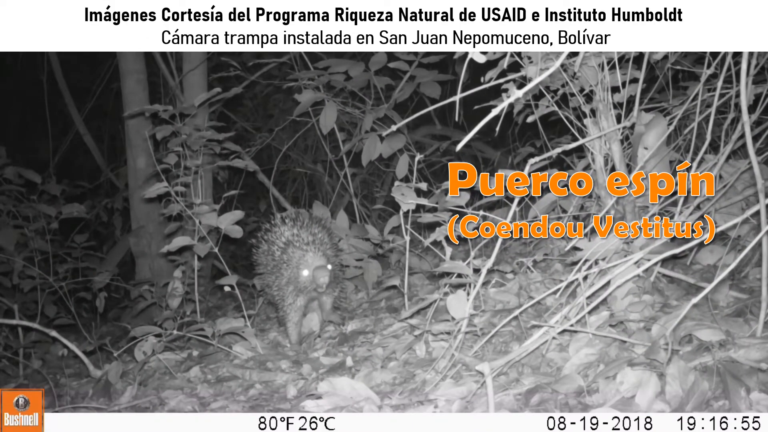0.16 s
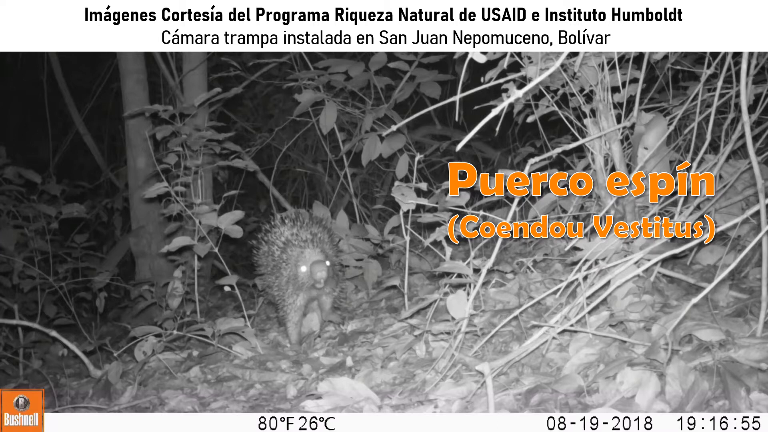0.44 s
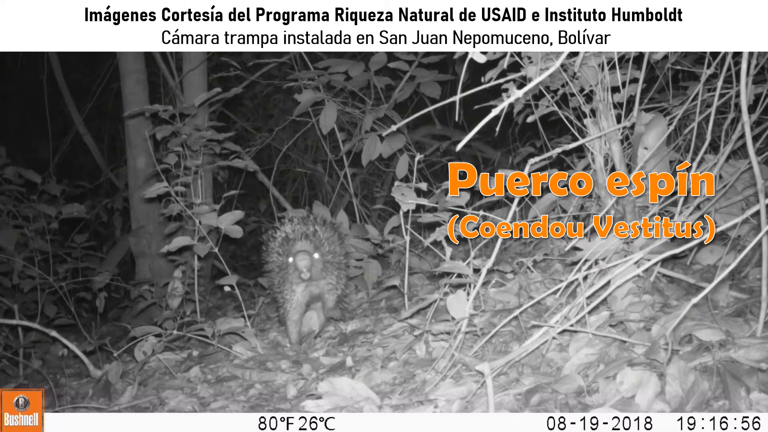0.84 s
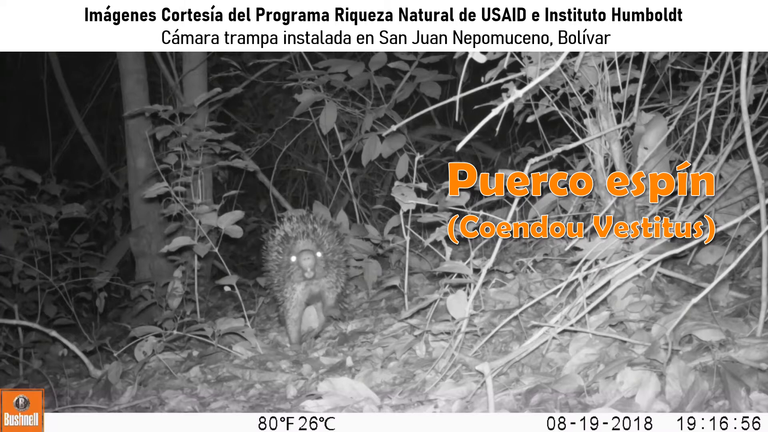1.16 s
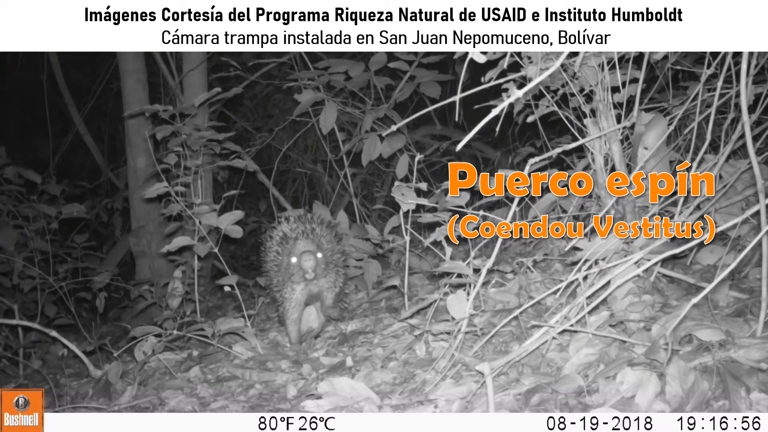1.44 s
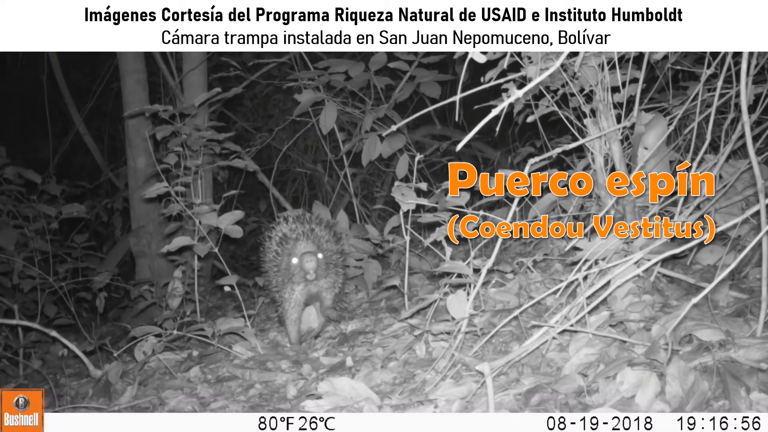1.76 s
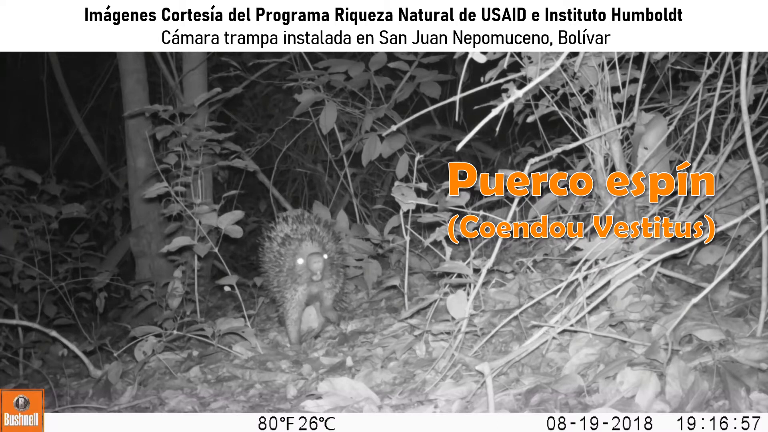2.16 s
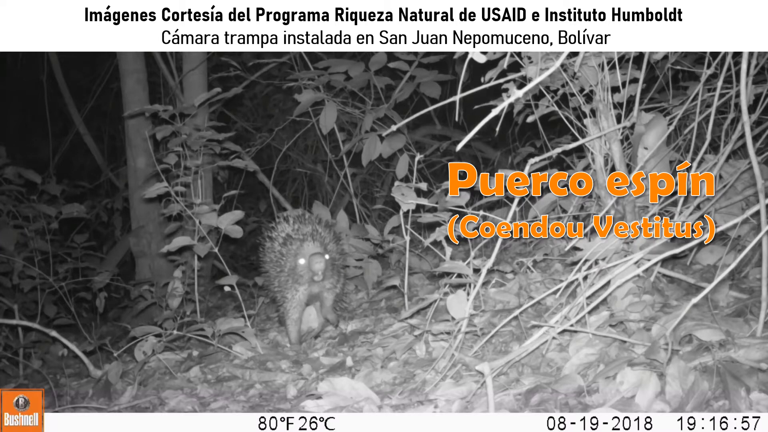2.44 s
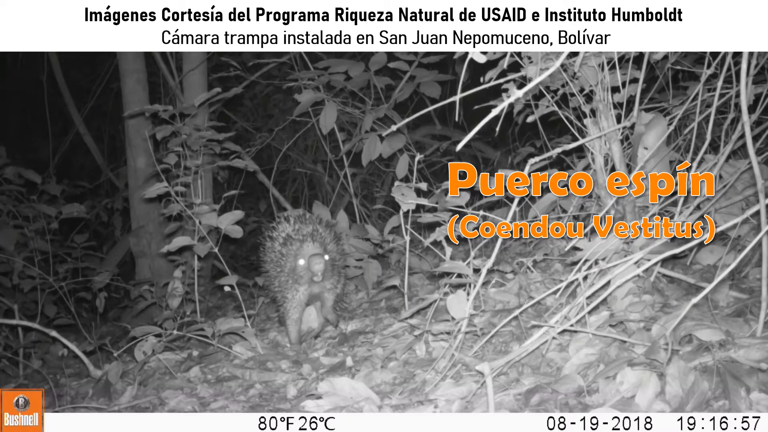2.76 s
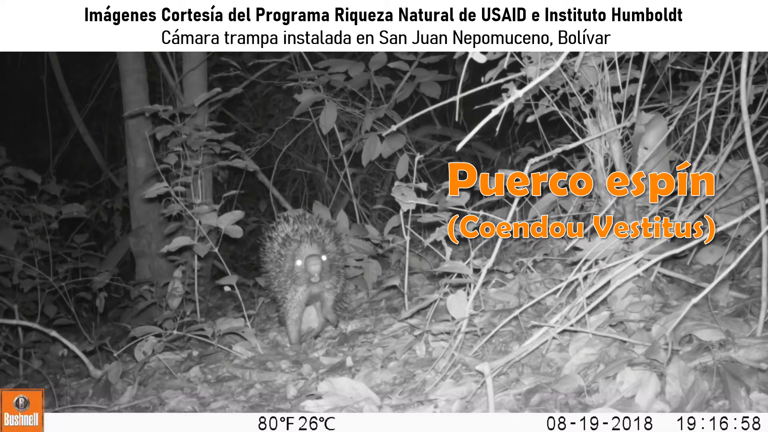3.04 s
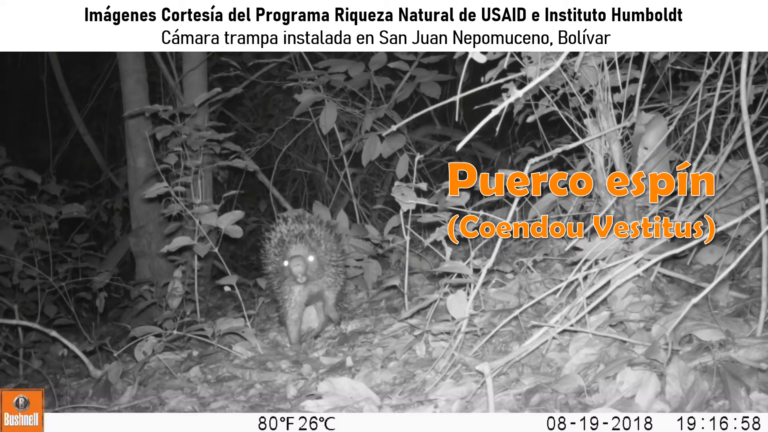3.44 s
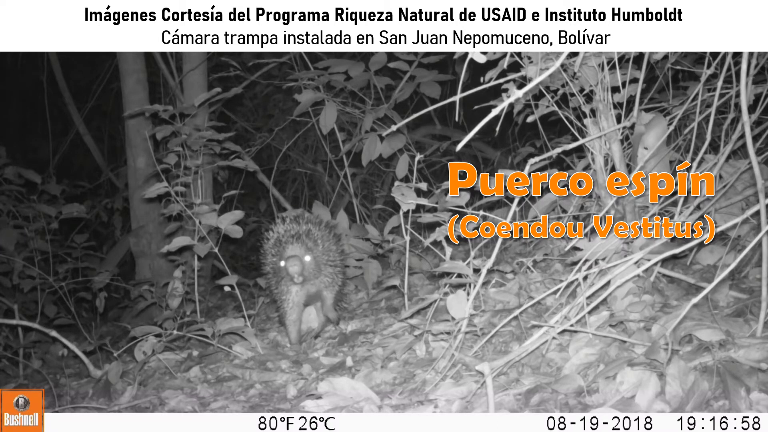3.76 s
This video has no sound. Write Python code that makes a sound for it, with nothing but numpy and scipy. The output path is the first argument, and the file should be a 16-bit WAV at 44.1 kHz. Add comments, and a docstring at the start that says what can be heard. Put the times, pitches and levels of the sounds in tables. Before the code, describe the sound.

Crickets trill throughout, high and bright, in short rough bursts about four per second, softening somewhat toward the end. Fast, steady, lower pips, brief buzzes, small whistles and very high katydid ticks fill in around them, over a continuous shimmering far insect chorus. Faint two-note frog chirps repeat until about 2.7 s. A twig clicks once at 2.4 s. Slight forest echo, soft hiss, faint gusts near 2.1 s and after 2.8 s.

```python
"""Crickets in a dry forest at night

Two near crickets trill, a softer third keeping time with the lower one, as rows of short falling tones.
Around them are fairly steady pips, comb-like buzzing notes, a two-note frog, whistles, and katydid ticks and
noisy rasps. Behind is a far chorus of randomly timed strokes. A twig clicks once as dying modes, the forest
scatters the near sounds, and a small microphone adds shaped noise: hiss, rumble and light gusts."""
import sys
import numpy as np
from scipy import signal
from scipy.fft import rfft, irfft
from scipy.io import wavfile
from scipy.ndimage import uniform_filter1d

SR = 44100
rng = np.random.default_rng(int(sys.argv[2]) if len(sys.argv) > 2 else 0)


def pcm_store(signal):
    """Save signal as 16-bit PCM."""
    levels = np.round(np.clip(np.atleast_2d(signal), -1, 1) * 32767)
    wavfile.write(sys.argv[1], SR, levels.astype(np.int16).T)


N = 171990  # samples, 3.9 s


def amp(db):
    """Turn dB into an amplitude factor."""
    return 10 ** (np.asarray(db) / 20)


def add(mix, start_s, sound):
    """Lay a sound into the mix, cutting whatever falls outside it."""
    at = round(start_s * SR)
    part = mix[max(at, 0):]
    heard = sound[max(-at, 0):]
    part[:len(heard)] += heard[:len(part)]


def note(length_s, level_db, hz, glide_hz, edge=0.17, bend=1, start_turns=None):
    """A gliding sine with soft ends, peaking 4 dB over level_db; a bend over 1 saves the glide for the end."""
    u = np.arange(0, length_s, 1 / SR) / length_s
    shape = np.sin(np.pi / 2 * np.clip(np.minimum(u, 1 - u) / edge, 0, 1)) ** 2
    if start_turns is None:
        start_turns = rng.random()
    pitch = hz + glide_hz * (u ** bend - 1 / (1 + bend))  # hz is the mean pitch
    turns = np.cumsum(pitch) / SR + start_turns
    return amp(level_db + 4) * shape * np.sin(2 * np.pi * turns)


# Tilt of the hiss and rumble. Each row: frequency in Hz, relative density in dB per Hz.
HISS_SPECTRUM = [(20, -4), (50, 2), (100, -1.5), (200, -7.5), (600, -10.5), (1500, -15.5), (3000, -18),
                 (9000, -19.5), (15500, -24)]
HISS_DB = -66  # RMS


def microphone_hiss():
    """White noise tilted in the spectrum gives the microphone's hiss and rumble."""
    f, density_db = np.transpose(HISS_SPECTRUM)
    hz = np.fft.rfftfreq(N, 1 / SR)
    tilt = amp(np.interp(np.log(hz + 1), np.log(f), density_db))
    hiss = irfft(rfft(rng.standard_normal(N)) * tilt, N)
    return amp(HISS_DB) * hiss / hiss.std()


# Light air on the microphone. Each row: time in seconds, level in dB, joined by straight lines in dB.
GUST_LEVELS = [(1.4, -91), (2.15, -70.5), (2.5, -91), (2.8, -77.5), (3.2, -79.5), (3.6, -76)]


def gusts():
    """Low band noise swells and sinks as air moves over the microphone."""
    s, level_db = np.transpose(GUST_LEVELS)
    band = signal.butter(2, [55, 170], "band", fs=SR, output="sos")
    air = signal.sosfilt(band, rng.standard_normal(N))
    return amp(np.interp(np.arange(N) / SR, s, level_db)) * air / air.std()


# Far chorus, one row for a kind of insect. Each row: pitch in Hz, pitch spread in Hz, glide in Hz,
# stroke length in seconds, mean strokes per second, RMS level in dB.
FAR_KINDS = [(3446, 140, -41, .02, 450, -75), (4036, 250, 8.5, 0.06, 350, -69),
             (4496, 78, -4, .03, 280, -74), (4880, 151.4, 30, 0.026, 600, -54.5),
             (5240, 170, 11, 0.2, 300, -64.5), (5810, 150, -64, 0.037, 1000, -63.5),
             (6510, 119, -120, 0.015, 690, -49), (7424, 123, -67, 0.01, 1000, -61.5),
             (8076, 225, -69, 0.01, 2500, -60), (10350, 300, -300, 0.016, 1500, -76.5),
             (6330, 500, -100, 0.0013, 1700, -65.5)]


def far_chorus():
    """Many unseen singers: strokes at random moments, pitches spread around each kind's own."""
    out = np.zeros(N)
    for hz, spread_hz, glide_hz, stroke_s, rate, level_db in FAR_KINDS:
        kind = np.zeros(N)
        strikes = rng.random(N) < rate / SR
        sizes = amp(1.3 * rng.standard_normal(N)) * strikes
        singer = rng.integers(0, 16, N)
        for k, z in enumerate(np.linspace(-1.6, 1.6, num=16)):
            stroke = note(stroke_s, 0, hz + spread_hz * z, glide_hz, edge=0.3)
            voice = signal.oaconvolve(sizes * (singer == k), stroke)[:N]
            kind += voice * np.exp(-z * z / 3)  # pitches far from the middle are softer
        out += amp(level_db) * kind / kind.std()
    return out


# Katydid runs. Each row: start in seconds, length in seconds, tick level in dB before note's lift
# and random unevenness, pitch in Hz.
TICK_RUNS = [(0.241, .2, -67.5, 10400), (0.441, .2, -73, 10040), (0.656, .03, -69, 10430),
             (0.785, .03, -72, 10600), (0.862, .03, -66.5, 10100), (0.986, .03, -68, 10100),
             (1.074, .23, -67, 10470), (1.438, .2, -71, 10040), (1.64, .03, -72, 10500),
             (1.924, .23, -68.5, 10500), (2.348, .03, -73, 10100), (2.496, .03, -68, 10340),
             (2.788, .23, -68, 10440), (3.229, .03, -66, 10350), (3.36, .03, -66.5, 10400),
             (3.646, .24, -67, 10350)]
TICK_PERIOD_S, TICK_S, TICK_GLIDE_HZ = .0353, 0.0186, -650


def katydid_ticks():
    """Runs of short falling tones near 10 kHz, slightly uneven in level."""
    out = np.zeros(N)
    for start, length, level_db, hz in TICK_RUNS:
        for k, uneven in enumerate(rng.standard_normal(8)):
            if k * TICK_PERIOD_S < length:
                tick = note(TICK_S, level_db + 1.4 * uneven, hz, TICK_GLIDE_HZ)
                add(out, start + k * TICK_PERIOD_S, tick)
    return out


# Katydid rasps. Each row: start in seconds, length in seconds, level in dB before note's lift,
# the fade and the roughness, centre in Hz, width in Hz.
RASP_NOTES = [(.325, 0.17, -68, 13850, 1100), (.455, .17, -71, 14100, 600), (0.598, .16, -69, 14050, 700),
              (.99, 0.087, -66, 13200, 1800), (1.125, .065, -66, 12700, 1800),
              (2.775, .14, -67, 14000, 900), (2.895, 0.14, -67, 14050, 800)]
RASP_FADE_DB = -12  # from start to end


def katydid_rasps():
    """A high tone multiplied by slow noise spreads into a rough band around its pitch."""
    out = np.zeros(N)
    for start, length, level_db, hz, width_hz in RASP_NOTES:
        tone = note(length, level_db, hz, 30, edge=0.27)
        tone = tone * amp(np.linspace(0, RASP_FADE_DB, num=len(tone)))
        lowpass = signal.butter(2, width_hz / 2, fs=SR, output="sos")
        rough = signal.sosfilt(lowpass, rng.standard_normal(SR // 4))[:len(tone)]
        add(out, start, tone * rough / rough.std())
    return out


# Single whistles. Each row: start in seconds, length in seconds, level in dB before note's lift,
# pitch in Hz, glide in Hz.
WHISTLE_NOTES = [(0.106, 0.039, -68, 7290, -22), (.15, .045, -60, 7330, -14),
                 (1.402, 0.063, -58, 7260, -46), (1.463, 0.041, -52, 7310, -25),
                 (2.45, 0.034, -61, 7170, 12), (2.518, .045, -55.5, 7290, 14),
                 (3.628, 0.12, -57, 7290, -41), (3.75, 0.11, -74, 7240, -60)]


def whistles():
    """Single gliding sines with soft ends."""
    out = np.zeros(N)
    for start, *settings in WHISTLE_NOTES:
        add(out, start, note(*settings))
    return out


# Modes of the twig. Each row: frequency in Hz, starting level in dB before the band filter,
# time to fall 60 dB in seconds.
TWIG_MODES = [(3900, -29.5, .004), (6300, -26.5, .007), (9500, -33, .004)]
TWIG_S = 2.3804


def twig():
    """One dry click: quickly dying modes with a very short onset, through a broad band filter."""
    out = np.zeros(N)
    t = np.arange(0, .03, 1 / SR)
    modes = sum(amp(db - 60 * t / t60) * np.sin(2 * np.pi * hz * t) for hz, db, t60 in TWIG_MODES)
    add(out, TWIG_S, modes * np.minimum(t / 0.00011, 1))
    band = signal.butter(1, [2200, 12000], "band", fs=SR, output="sos")
    return signal.sosfilt(band, out)


# Frog chirps. Each row: start in seconds, reference level in dB, from which both notes are set.
FROG_CHIRPS = [(0.0582, -56.5), (0.2574, -56), (0.4574, -55.5), (0.6968, -56), (0.9098, -57), (1.1029, -57),
               (1.3354, -57), (1.5698, -57), (1.7649, -57.5), (1.9664, -57.5), (2.1705, -57.5),
               (2.4044, -56.5), (2.6354, -56.5)]
FROG_HZ, FROG_GLIDE_HZ, FROG_S = 3360, -260, .023
ANSWER_S, ANSWER_DB, FROG_TAIL_S = .026, -11, .055  # delay, relative level and length of the second note


def frog():
    """A short note that falls late, then a softer, lingering second note that dies away."""
    out = np.zeros(N)
    for start, level_db in FROG_CHIRPS:
        chirp = note(FROG_S, level_db - 3, FROG_HZ + FROG_GLIDE_HZ / 6, FROG_GLIDE_HZ, edge=.2, bend=3.)
        add(out, start, chirp)
        tail = note(FROG_TAIL_S, level_db + ANSWER_DB, FROG_HZ + 10, -25, edge=0.048)
        add(out, start + ANSWER_S, tail * amp(np.linspace(2, -14, num=len(tail))))
    return out


# Buzzing notes. Each row: start in seconds, length in seconds, reference level in dB, main line in Hz,
# line spacing in Hz, then the first line below and the line above in dB relative to the main line.
BUZZ_NOTES = [(.415, .108, -54, 5264, 251, -2, -3), (1.903, .095, -53, 5246, 250, -1, -3),
              (3.678, .097, -56, 5237, 249, 1, 0), (.262, .11, -56, 5337, 253, -1, -8),
              (.88, .12, -59, 5184, 247, -5, -9), (.74, .1, -64, 5334, 251, -5, -3),
              (2.195, .06, -60, 5307, 270, -5, -7), (2.385, .1, -62, 5356, 254, -1, -9),
              (2.815, .1, -62, 5294, 250, -5, -10), (.565, .21, -66.5, 4145, 318, -9, -16),
              (.79, .165, -68, 4085, 317, 0, -14), (1.74, .15, -68, 4139, 320, -7, -5),
              (2.055, .11, -60, 3956, 317, -8, -14), (1.185, .13, -75, 3888, 313, 4, 2),
              (3.77, .14, -66, 4147, 317, -5, -9), (3.77, .13, -68, 4387, 315, -5, -9)]
BUZZ_FLUTTER, BUZZ_EDGE, LOWEST_LINE_HZ = .3, .14, 3550  # flutter depth, soft share of each end, cutoff


def buzzes():
    """A comb of closely spaced lines beats as a buzz, each line fluttering in level by itself."""
    out = np.zeros(N)
    for start, length, level_db, main_hz, spacing_hz, below_db, above_db in BUZZ_NOTES:
        for k, db in [(-2, 2 * below_db), (-1, below_db), (0, 0.012), (0.84, above_db)]:
            hz = main_hz + k * spacing_hz
            if hz <= LOWEST_LINE_HZ:
                continue
            line = note(length, level_db + db - 1.0, hz, -12, edge=BUZZ_EDGE)
            flutter = uniform_filter1d(rng.standard_normal(SR // 4), size=500)[:len(line)]
            add(out, start, line * (1 + BUZZ_FLUTTER * flutter / flutter.std()))
    return out


# Steady pips, one row for a repeated note; the two rows near 5060 Hz form a quick double pip, a rising
# note then a second. Each row: first pip in seconds, end of the row in seconds, period in seconds,
# pip length in seconds, mean pitch in Hz, glide in Hz, mean level in dB before note's lift.
PIP_ROWS = [(.075, 3.9, .1036, .052, 4700, -20, -53), (-.012, 3.9, .10395, .038, 5055, 120, -52),
            (.031, 3.9, .10395, .03, 5060, 50, -54.5), (.064, 1.5, .1048, .03, 4830, -30, -56),
            (1.549, 3.9, .1042, .036, 4895, 20, -59), (2.595, 3.9, .104, .042, 4702, -10, -56)]
PIPS_UNEVEN_DB = 1.7


def pips():
    """Rows of one short, clear note, each repeated at a fixed period with small changes of level and pitch."""
    out = np.zeros(N)
    for first, last, period, length, hz, glide_hz, level_db in PIP_ROWS:
        for k, (louder, sharper) in enumerate(rng.standard_normal((40, 2))):
            start = first + k * period
            if start < last:
                pip = note(length, level_db + PIPS_UNEVEN_DB * louder, hz + 6 * sharper, glide_hz)
                add(out, start, pip)
    return out


SWELL_S, FADE_DB, SLIP_TURNS = .06, -2.5, .2  # swell time scale, fade over a trill, random phase slip


def cricket(trills, hz, glide_hz, strokes_per_s, duty, uneven_db):
    """Each trill is a row of wing strokes: falling tones roughly in phase that swell in and slowly fade."""
    out = np.zeros(N)
    for start, length, level_db in trills:
        first_turns = rng.random()
        for k, (louder, sharper, slip) in enumerate(rng.standard_normal((16, 3))):
            s = round(k / strokes_per_s * SR) / SR
            stroke_db = level_db + uneven_db * louder + FADE_DB * s / length
            stroke = note(duty / strokes_per_s, stroke_db, hz + 8 * sharper, glide_hz, edge=0.33,
                          start_turns=first_turns + hz * s + SLIP_TURNS * slip)
            swell = min(0.55 + s / SWELL_S, 1)
            ending = np.clip((length - s) * strokes_per_s, 0, 1)  # a last, partial stroke is softer
            add(out, start + s, ending * swell * stroke)
    return out


# Trills of the upper and of the lower cricket. Each row: start in seconds, length in seconds,
# level in dB before note's lift, the swell, the fade and random unevenness.
UPPER_TRILLS = [(.045, 0.14, -37), (.288, 0.1, -36.5), (.517, 0.12, -36.5), (.762, 0.052, -33.5),
                (.99, 0.12, -38), (1.232, 0.11, -34.5), (1.48, 0.11, -36), (1.725, 0.11, -41),
                (1.932, 0.13, -36), (2.155, 0.15, -37.5), (2.397, 0.11, -35.5), (2.69, 0.038, -40),
                (2.933, 0.11, -37.5), (3.153, 0.14, -42), (3.38, 0.13, -49.5), (3.88, 0.072, -43)]
LOWER_TRILLS = [(.06, 0.22, -42.5), (.35, 0.071, -41), (.52, 0.18, -46), (.66, 0.242, -42),
                (.99, 0.065, -38.5), (1.225, 0.19, -43.5), (1.49, 0.099, -46.5), (1.69, 0.19, -42),
                (1.95, .11, -49), (2.185, 0.17, -39.5), (2.42, 0.14, -51), (2.698, 0.2, -42),
                (2.95, 0.078, -54), (3.125, 0.21, -44), (3.4, .15, -53), (3.665, 0.15, -42)]
MATE_DB, MATE_LAG_S = -8.5, 0.011


def near_crickets():
    """Three pairs of wings, each with its own pitch and stroke rate; a mate follows the lower cricket."""
    mate_trills = [(start + MATE_LAG_S, length, db + MATE_DB) for start, length, db in LOWER_TRILLS]
    upper = cricket(UPPER_TRILLS, hz=6652, glide_hz=-45, strokes_per_s=50, duty=.98, uneven_db=2.8)
    lower = cricket(LOWER_TRILLS, hz=6438, glide_hz=-50, strokes_per_s=38.5, duty=.98, uneven_db=2.5)
    mate = cricket(mate_trills, hz=6340, glide_hz=-260, strokes_per_s=49, duty=.9, uneven_db=3.)
    return upper + lower + mate


FOREST_T60_S, FOREST_DB, TWIG_FOREST_DB = .25, -10, -16  # decay time, echo send of the callers and the twig


def forest(x):
    """Scattering by trunks and leaves: sparse taps of random sign that die away."""
    at = np.arange(200, SR // 2, 40)
    taps = np.zeros(SR // 2 + 40)
    signs = rng.choice([-1., 1.], len(at))
    taps[at + rng.integers(0, 40, len(at))] = signs * amp(-60 * at / SR / FOREST_T60_S)
    return signal.oaconvolve(x, taps / np.linalg.norm(taps))[:N]


def scene():
    """The far chorus stays dry; near callers and the twig also send echoes into the forest."""
    far = far_chorus()
    near = katydid_ticks() + katydid_rasps() + whistles() + frog() + buzzes() + pips() + near_crickets()
    click = twig()
    echoes = forest(amp(FOREST_DB) * near + amp(TWIG_FOREST_DB) * click)
    return (near + click + far + echoes)[None]


EDGE_HZ = 15690


def record(dry):
    """The microphone adds hiss, rumble and gusts, then a steep lowpass limits the band."""
    wet = dry + microphone_hiss() + gusts()
    lowpass = signal.firwin(1023, EDGE_HZ, window=("kaiser", 9), fs=SR)
    return signal.oaconvolve(wet, lowpass[None], "same")


dry = scene()
out = record(dry)
pcm_store(out)
```